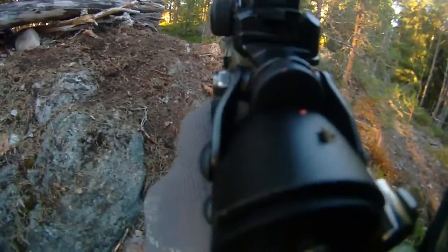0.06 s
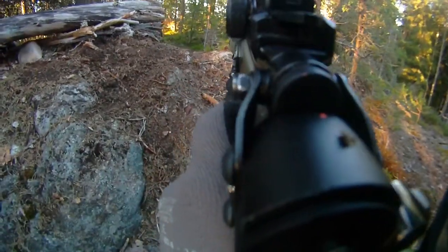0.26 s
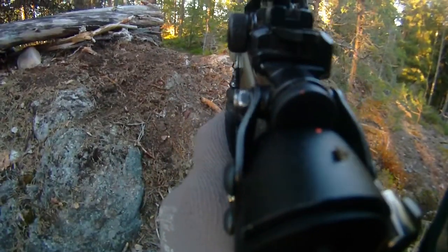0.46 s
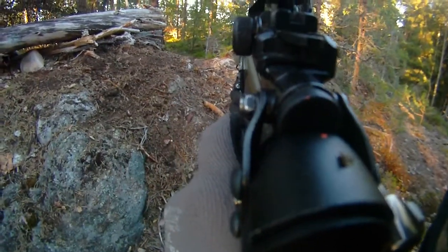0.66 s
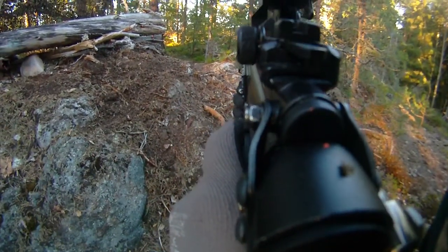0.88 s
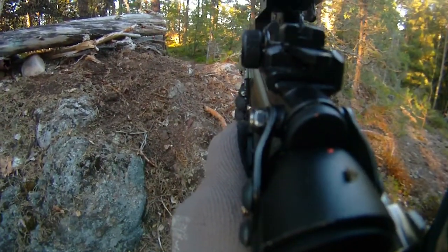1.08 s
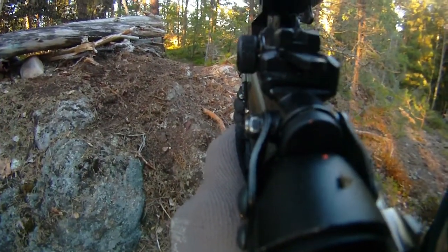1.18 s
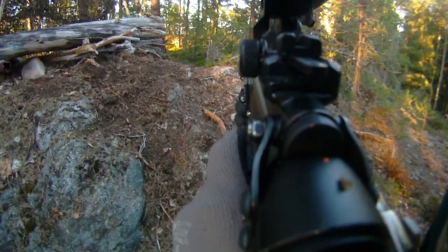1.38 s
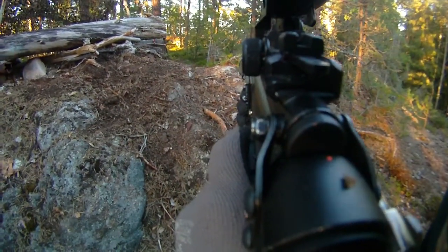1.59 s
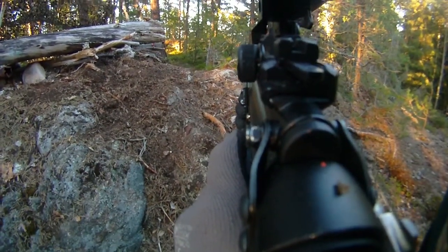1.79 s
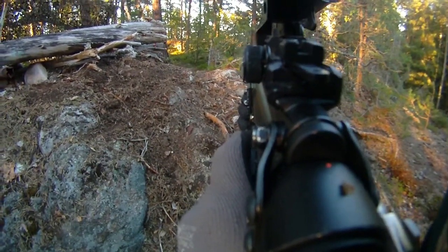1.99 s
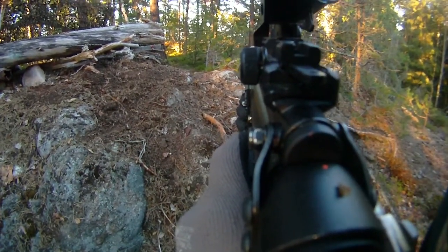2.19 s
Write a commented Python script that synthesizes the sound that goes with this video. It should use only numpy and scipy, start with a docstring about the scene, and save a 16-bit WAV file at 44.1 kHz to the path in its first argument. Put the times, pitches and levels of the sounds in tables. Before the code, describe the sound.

A paintball marker fires seven sharp, close shots in quick, uneven succession, echoing softly in woodland.

```python
"""A sharp pop sounds over a faint hush, then a mechanical paintball marker fires seven shots close by.
Each shot is a quick chain of blows: a catch (the sear) lets go, a hammer opens the gas valve, and the gas
throws the hammer back to its stop, where it latches. The shots overload the microphone and leave the frame
humming and a metal part ringing. More lone pops and small ticks fall between; the trees echo softly."""
import sys
import numpy as np
from scipy import signal
from scipy.fft import rfft, irfft
from scipy.io import wavfile

SR = 44100
rng = np.random.default_rng(int(sys.argv[2]) if len(sys.argv) > 2 else 0)


def to_wav(sig):
    """Store sig (one row per channel, or 1-D mono) as 16-bit WAV at the path in sys.argv[1].

    Samples outside -1..1 are clipped; the rate is SR.
    """
    pcm = np.clip(np.atleast_2d(sig), -1, 1) * 32767
    pcm = np.round(pcm).astype(np.int16)
    wavfile.write(sys.argv[1], SR, pcm.T)  # frames by channels


N = 99225
TAPS = 4096  # samples in one short sound or filter
HZ = np.fft.rfftfreq(TAPS, 1 / SR)


def amp(db):
    """Turns decibels into a number to multiply by."""
    return 10 ** (np.asarray(db) / 20)


def read_curve(points, hz):
    """Reads between the rows of a (frequency, value) table, on a log-frequency scale."""
    freqs, values = np.transpose(points)
    return np.interp(np.log(hz + 1), np.log(freqs + 1), values)


def add(mix, start, sound):
    """Lays a sound into the mix at a start time in seconds."""
    part = mix[max(round(start * SR), 0):][:len(sound)]
    part += sound[:len(part)]


def resonance(hz, width):
    """Power at each frequency for something that sounds mainly in one band."""
    return 1 / (1 + ((HZ - hz) / width * 2) ** 4)


def tap_response(power):
    """The sound, with energy 1, of one instant tap on something with this power spectrum."""
    log_gain = np.log(power / power.max() + 1e-10) / 2
    mirrored = np.r_[log_gain, log_gain[-2:0:-1]]
    spectrum = np.exp(np.conj(signal.hilbert(mirrored)))  # nothing sounds before the tap
    sound = np.fft.ifft(spectrum).real
    return sound / np.linalg.norm(sound)


def burst(db, rise, hold, decay):
    """A rush of tiny contacts, even from bass to treble, that rises, holds and dies away."""
    t = np.arange(TAPS) / SR
    shape = np.minimum(t / rise, 1) * np.exp(-np.maximum(t - rise - hold, 0) / decay)
    spectrum = rfft(shape * rng.standard_normal(TAPS))
    even = irfft(spectrum / (abs(spectrum) + 1e-12)) * np.sqrt(shape)
    return amp(db) * even * np.linalg.norm(shape) / np.linalg.norm(even)


def struck(tones):
    """A struck object sounds several pure tones, each fading at its own speed."""
    t = np.arange(SR // 2) / SR
    return sum(amp(db - 60 * t / fade) * np.sin(2 * np.pi * (hz * t + rng.random()))
               for hz, db, fade in tones)


# Tone of the background hush: (frequency [Hz], relative level [dB])
HUSH_TONE = [(30, -20), (100, -11), (170, -15), (290, -19), (450, -15), (680, -7), (950, -6), (1400, 1),
             (1900, -7), (2400, -14), (3700, -14), (4900, -9), (6200, -20), (7200, -27), (7900, -22),
             (9000, -30), (16000, -37)]
def background_hush(level_db=-55.7):
    """A steady background hush, coloured by the microphone housing."""
    gain = amp(read_curve(HUSH_TONE, np.fft.rfftfreq(N, 1 / SR)))
    hush = irfft(rfft(rng.standard_normal(N)) * gain, N)
    return amp(level_db) * hush / hush.std()


# Tone of the echo: (frequency [Hz], relative level [dB])
ECHO_TONE = [(40, 4), (170, 9), (260, 9), (450, 3), (700, 3), (1000, 0), (1400, -5), (2000, -4), (2500, -9),
             (3400, -5), (4000, -1), (5000, -2), (6300, 1), (8000, 0), (16000, -6)]
# How long the echo lasts: (frequency [Hz], time to fade by 60 dB [s])
ECHO_FADE = [(100, .6), (700, .6), (1500, .7), (5000, .65), (9000, .5), (16000, .4)]
def tree_echo(sound, near_db=9, near_decay_s=.022, rise_s=.012):
    """Sound bounces off near ground and far trunks; each frequency fades at its own speed."""
    hz, t, noise = signal.stft(rng.standard_normal(SR), SR, nperseg=256)
    fading = amp(read_curve(ECHO_TONE, hz)[:, None] - 60 * t / read_curve(ECHO_FADE, hz)[:, None])
    near_boost = 1 + amp(near_db) * np.exp(-t / near_decay_s)
    onset = np.minimum(t / rise_s, 1)
    tail = signal.istft(noise * fading * near_boost * onset, SR, nperseg=256)[1]
    return signal.fftconvolve(sound, tail / np.linalg.norm(tail))[:N]


# Small ticks: (time [s], level [dB], frequency [Hz], band width [Hz], decay time [s])
SMALL_TICKS = [(.155, -43, 1440, 600, .004), (.328, -50, 606, 120, .012), (.352, -51, 1420, 500, .006),
               (.471, -38, 2690, 3000, .003), (.529, -42, 5080, 1500, .015), (1.094, -49, 606, 100, .012),
               (1.129, -52, 620, 150, .012), (1.166, -50, 3800, 2000, .003),
               (1.4485, -28, 1600, 550, .0016), (1.799, -47, 5180, 1200, .008),
               (2.216, -52, 1500, 700, .008)]
def ticks(edge_db=-9):
    """Faint short ticks, each with one resonance and a bright edge."""
    out = np.zeros(N)
    bright_edge = amp(edge_db) ** 2 * resonance(hz=4900, width=1800)
    for start, db, hz, width, decay in SMALL_TICKS:
        body = tap_response(resonance(hz, width) + bright_edge * width / 1000)
        add(out, start, signal.fftconvolve(burst(db, rise=.0005, hold=.001, decay=decay), body))
    return out


# Tone of a pop: (frequency [Hz], relative level [dB])
POP_TONE = [(40, -31), (170, -32), (290, -9), (380, -18), (700, -6), (950, -4), (1250, -3), (1430, 8),
            (1650, -8), (2000, -9), (2600, -8), (3200, -12), (4100, -4), (5300, -7), (7000, -21),
            (10000, -36), (16000, -51), (20000, -60)]
# Tone of the hiss from twigs and needles: (frequency [Hz], relative level [dB])
TWIG_TONE = [(100, -40), (1000, -14), (2500, 0), (3500, -8), (5000, 0), (6500, -4), (10000, -15),
             (16000, -25)]
# The pops: (time [s], level [dB], bass boost [dB], treble boost [dB], echo and hiss boost [dB])
LONE_POPS = [(.0618, -6.5, 0, -1, 1), (.5014, 4, 8, 3, -1), (1.1845, -1.5, 0, 0, 0),
             (1.7552, -2.5, 0, 0, 0)]
def pops(scatter_decay_s=.0062, hiss_db=-42, hiss_decay_s=.048, bass_hz=500, treble_hz=2500):
    """Pressure spikes that twigs scatter back as hiss; returns what is heard and what the trees echo."""
    heard, to_trees = np.zeros(N), np.zeros(N)
    t = np.arange(SR // 4) / SR
    twigs = tap_response(amp(read_curve(TWIG_TONE, HZ)) ** 2)
    for start, db, bass_db, treble_db, echo_db in LONE_POPS:
        spike = .2 * rng.standard_normal(len(t)) * np.exp(-t / scatter_decay_s)
        spike[0] = 1.25  # the spike itself, ahead of its short scatter
        tilt_db = treble_db * HZ / (HZ + treble_hz) + bass_db / (1 + (HZ / bass_hz) ** 2)
        tone = tap_response(amp(read_curve(POP_TONE, HZ) + tilt_db) ** 2)
        pop = amp(db) * signal.fftconvolve(spike, tone)
        hiss = signal.fftconvolve(rng.standard_normal(len(t)) * np.exp(-t / hiss_decay_s), twigs)
        add(heard, start, pop + amp(db + echo_db + hiss_db) * hiss)
        add(to_trees, start, amp(echo_db) * pop)
    bass_cut = signal.butter(1, 900, "high", fs=SR)
    return heard, signal.lfilter(*bass_cut, to_trees)


# Tones of the hollow frame and ball hopper: (frequency [Hz], level [dB], time to fade by 60 dB [s])
FRAME_TONES = [(178, -11, .17), (272, -20, .5), (372, -3, .16), (530, 0, .16), (655, -1, .15),
               (800, 3, .15), (1060, 4, .13), (1140, 4, .13), (1640, 0, .12)]
# Tones of the metal part: (frequency [Hz], level [dB], time to fade by 60 dB [s])
METAL_TONES = [(2683, 0, .43), (2902, -14, .29), (3521, -25, .32), (4953, -22, .36), (6444, -24, .15)]
def ringing(shots, metal_db=-31.5, frame_db=-37, lag_s=.017):
    """After each shot the hollow frame hums briefly and a metal part, probably the spring, sings on."""
    out = np.zeros(N)
    for start, *_, ring_db in shots:
        metal = amp(metal_db + ring_db) * struck(METAL_TONES)
        frame = amp(frame_db) * struck(FRAME_TONES)
        add(out, start + lag_s, metal + frame)
    return out


# The marker's resonances and how strongly each blow stirs them: (frequency [Hz], band width [Hz],
# sear [dB], hammer and gas [dB], recoil [dB], stop [dB], latch [dB], settling [dB])
MARKER_BODY = [(60, 200, -30, -24, -24, -23, -28, -23), (300, 130, -28, -16, -21, -19, -33, -21),
               (450, 200, -27, -13, -29, -28, -26, -20), (620, 110, -21, -14, -16, -19, -24, -22),
               (730, 120, -30, -2, -6, -7, -20, -20), (880, 150, -20, 1, -7, -4, -15, -12),
               (1160, 240, -11, 3, -3, 0, -8, -6), (1420, 250, 0, 6, -3, 7, 0, 0),
               (1780, 320, -12, 1, -11, -5, -8, -7), (2560, 420, -6, 1, -2, 3, 0, -8),
               (3380, 380, -15, -7, 3, -5, -6, -19), (4700, 550, -9, 0, 3, 4, 0, -14),
               (5100, 500, -6, -.5, 3, .5, .5, -9), (5750, 1200, -14, -7, -8, -7.5, -9, -22),
               (7000, 5600, -31, -21, -22, -19, -26, -30)]
# The blows of one shot, by name: (level [dB], rise time [s], hold time [s], decay time [s])
BLOW_SHAPES = {"sear": (-19, .004, .001, .006), "rattle": (-22, .002, .001, .004),
               "slide": (-15.5, .006, .001, .002), "hammer": (-3, .0004, .001, .003),
               "gas": (-5.3, .001, .0022, .0048), "recoil": (-.5, .0004, .0012, .0017),
               "stop": (-1.3, .0008, .0026, .0028), "latch": (-4, .0005, .0014, .0017),
               "settle": (-19, .002, .002, .0075)}
# The shots: (hammer strike time [s], delay to recoil [s], delay to stop [s], delay to latch [s],
# shot level [dB], latch level [dB], metal ring level [dB])
SEVEN_SHOTS = [(.2100, .0110, .0160, .0276, 1, -4, -6), (.4168, .0120, .0173, .0284, 0, 0, 1),
               (.6829, .0122, .0172, .0279, 0, 1, -9), (.9818, .0119, .0168, .0310, -.5, -3, -5),
               (1.2671, .0120, .0173, .0268, -1, -1, -5), (1.5648, .0122, .0172, .0285, -1, 1, 0),
               (1.9301, .0120, .0174, .0276, -1, 0, 4)]
def marker(muzzle_db=.5, muzzle_lag_s=.0018):
    """The sear trips, the hammer slides and opens the valve, gas throws it to its stop, and it latches."""
    powers = sum(resonance(hz, width) * amp(levels)[:, None] ** 2 for hz, width, *levels in MARKER_BODY)
    sear, hammer, recoil, stop, latch, settle = [tap_response(power) for power in powers]
    muzzle = tap_response(resonance(hz=440, width=240))  # the pressure pulse that leaves the barrel
    out = np.zeros(N)
    for start, recoil_s, stop_s, latch_s, db, latch_db, _ in SEVEN_SHOTS:
        add(out, start + muzzle_lag_s, amp(muzzle_db + db) * muzzle)
        # (blow, time from the hammer strike [s], body sound, extra level [dB])
        chain = [("sear", -.0252, sear, 0), ("rattle", -.0155, sear, 0), ("slide", -.0075, latch, 0),
                 ("hammer", 0, hammer, db), ("gas", .003, hammer, db),
                 ("recoil", recoil_s, recoil, db), ("stop", stop_s, stop, db),
                 ("latch", latch_s, latch, latch_db), ("settle", latch_s + .005, settle, 0)]
        for name, delay, body, extra_db in chain:
            blow = signal.fftconvolve(burst(*BLOW_SHAPES[name]), body)
            add(out, start + delay, amp(extra_db) * blow)
    return out


def scene():
    """Mixes hush, echo, ticks, pops and the marker into one channel."""
    shots = marker()
    lone_pops, pops_to_trees = pops()
    echo = tree_echo(amp(-32.3) * shots + amp(-17) * pops_to_trees)
    return (shots + ringing(SEVEN_SHOTS) + lone_pops + ticks() + echo + background_hush())[None]


def record(dry, ceiling=.96, hardness=12, bass_hz=170, bass_removed=.7, top_hz=16100):
    """The overloaded microphone flattens each shot's peaks; the bass is thinned and the top treble cut."""
    clipped = dry / (1 + abs(dry / ceiling) ** hardness) ** (1 / hardness)
    bass = signal.lfilter(*signal.butter(1, bass_hz, fs=SR), clipped)
    treble_cut = signal.firwin(255, top_hz, window=("kaiser", 8), fs=SR)
    return signal.oaconvolve(clipped - bass_removed * bass, treble_cut[None], "same")


dry = scene()
out = record(dry)
to_wav(out)
```